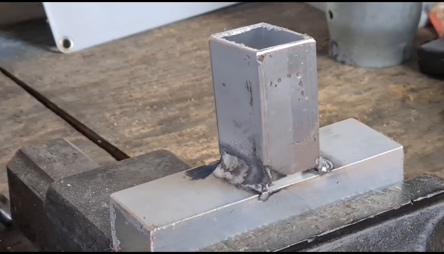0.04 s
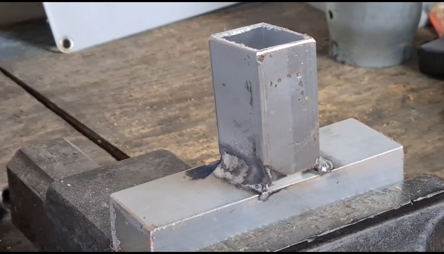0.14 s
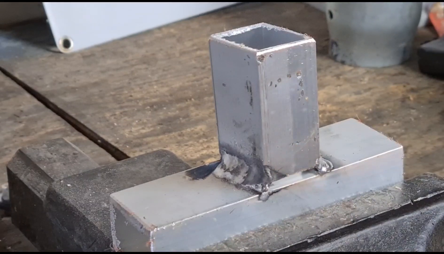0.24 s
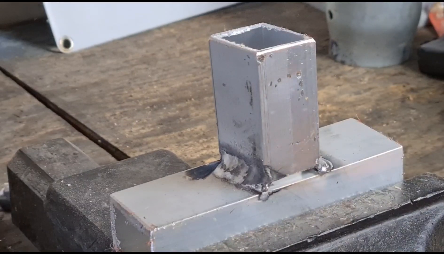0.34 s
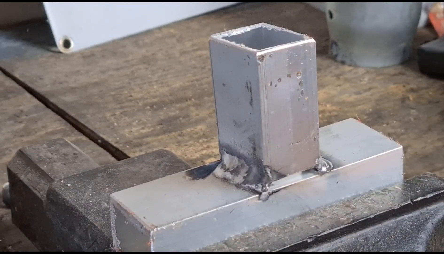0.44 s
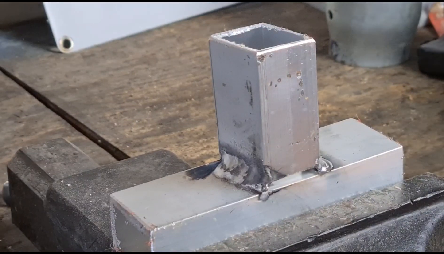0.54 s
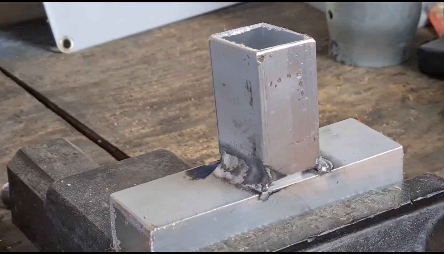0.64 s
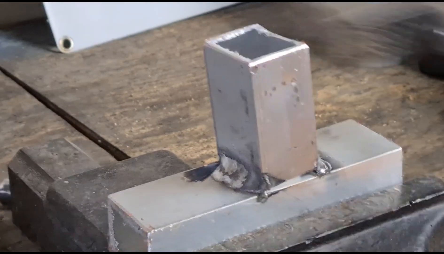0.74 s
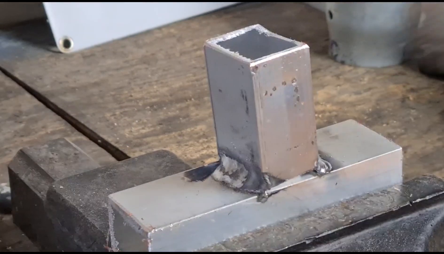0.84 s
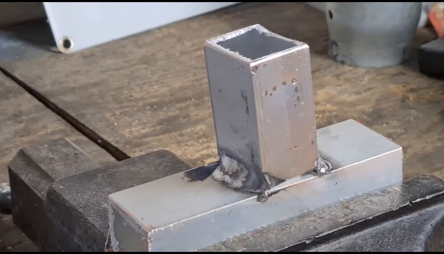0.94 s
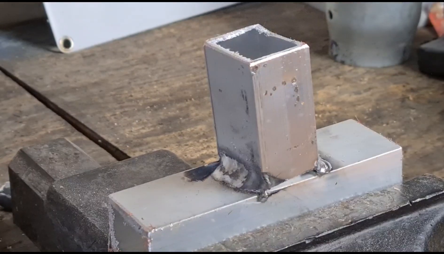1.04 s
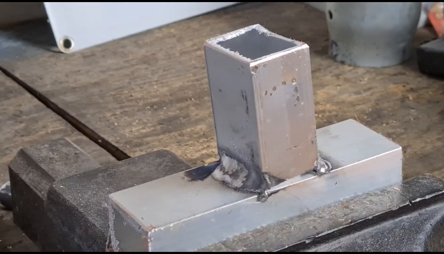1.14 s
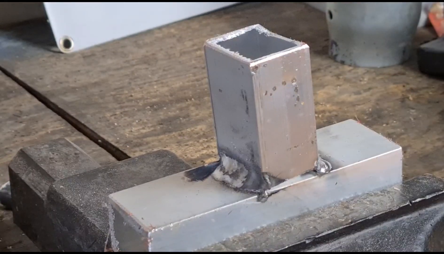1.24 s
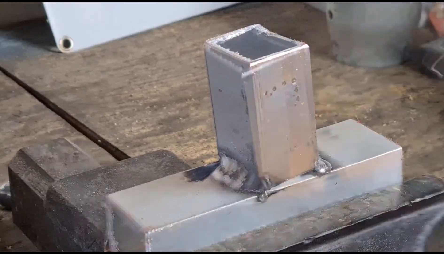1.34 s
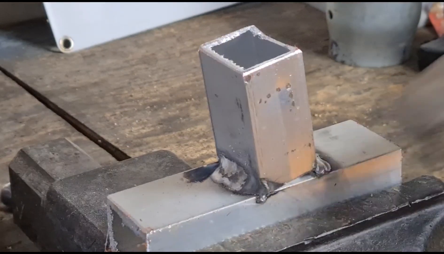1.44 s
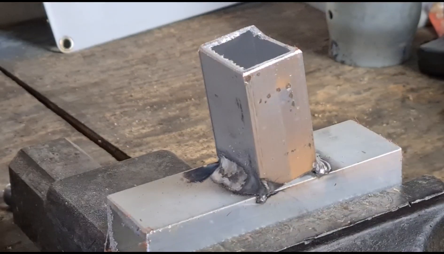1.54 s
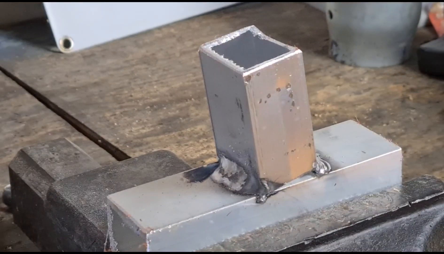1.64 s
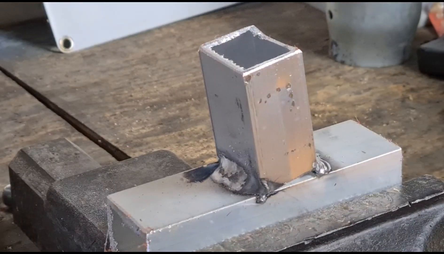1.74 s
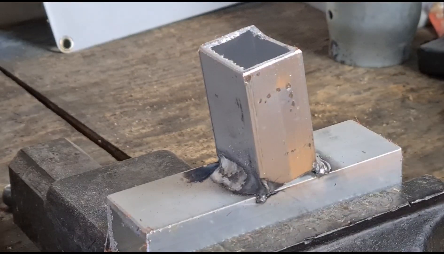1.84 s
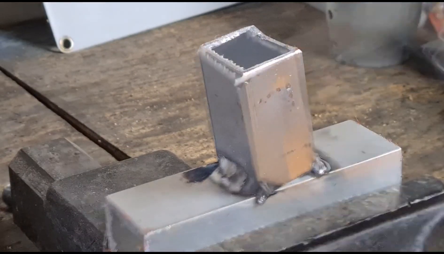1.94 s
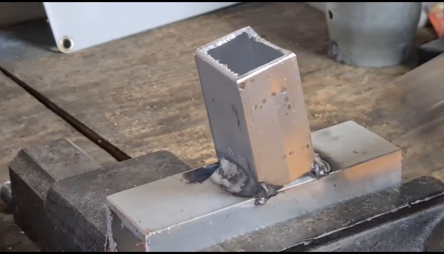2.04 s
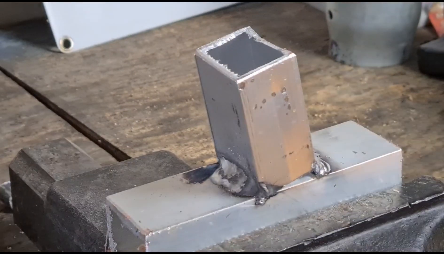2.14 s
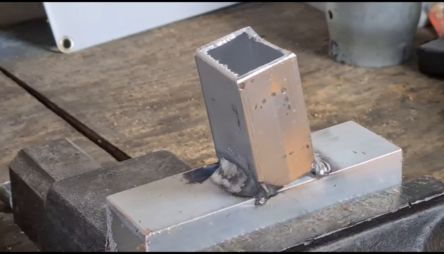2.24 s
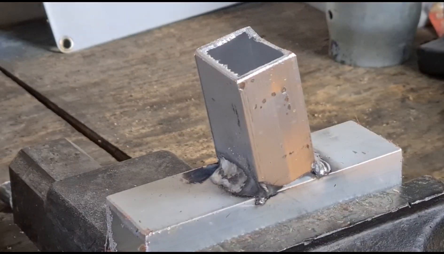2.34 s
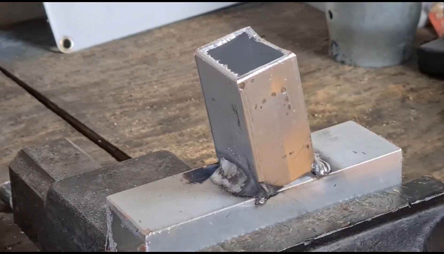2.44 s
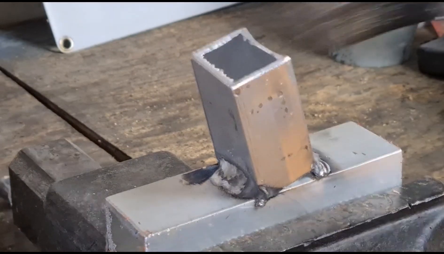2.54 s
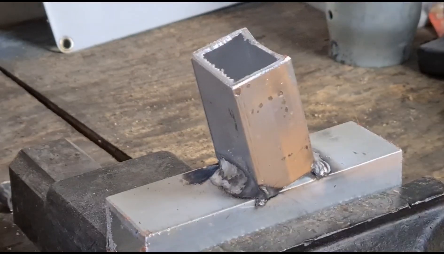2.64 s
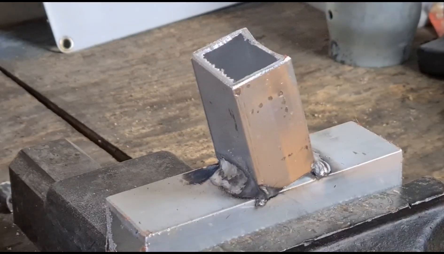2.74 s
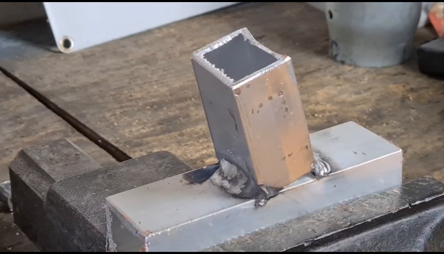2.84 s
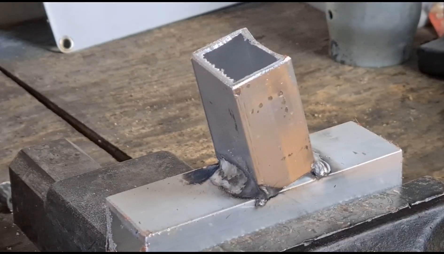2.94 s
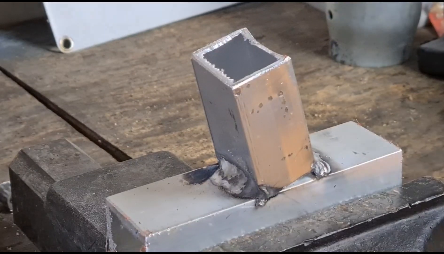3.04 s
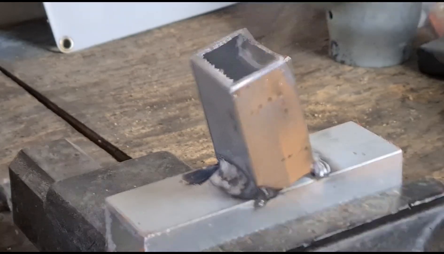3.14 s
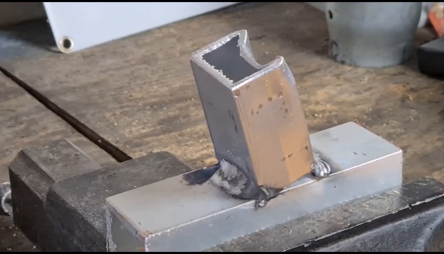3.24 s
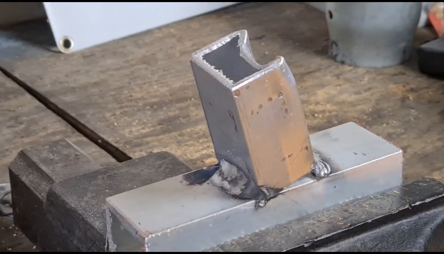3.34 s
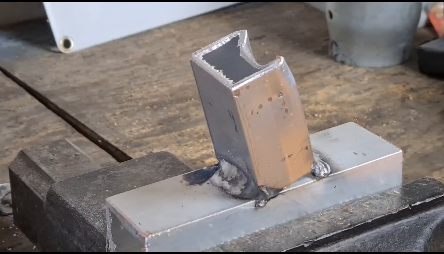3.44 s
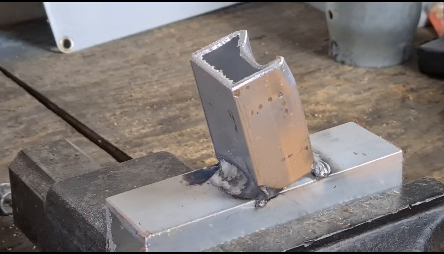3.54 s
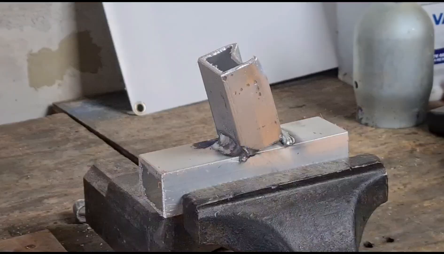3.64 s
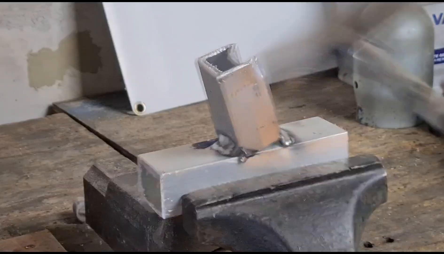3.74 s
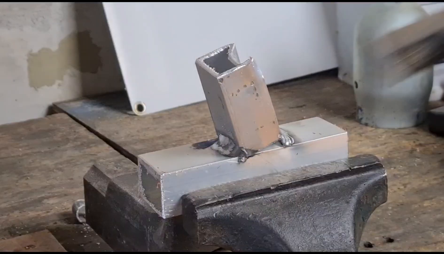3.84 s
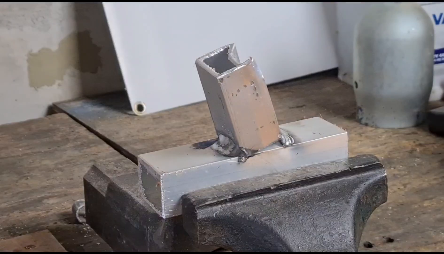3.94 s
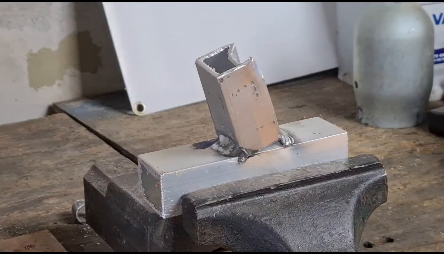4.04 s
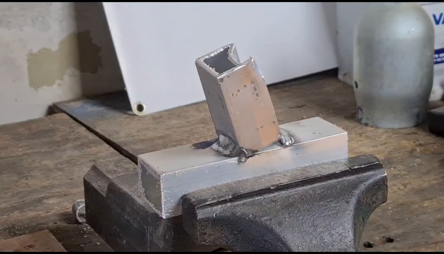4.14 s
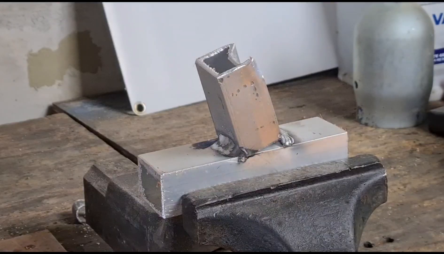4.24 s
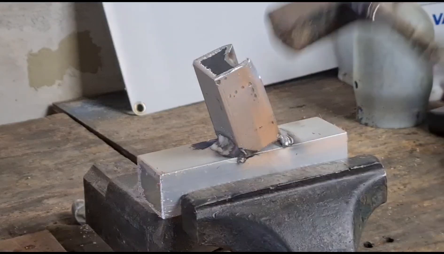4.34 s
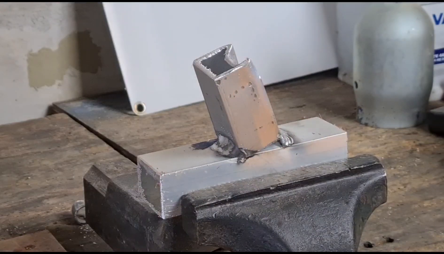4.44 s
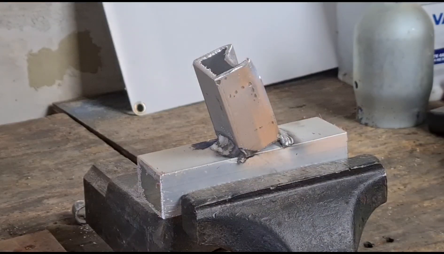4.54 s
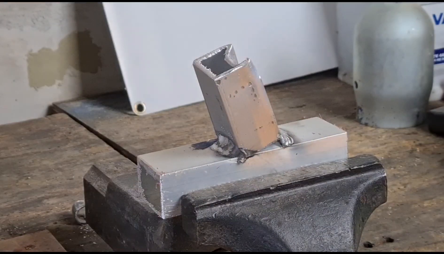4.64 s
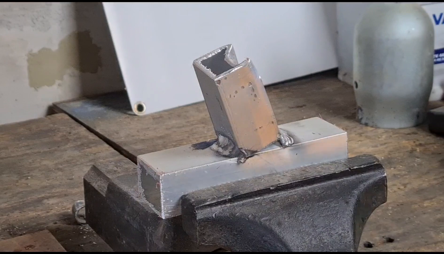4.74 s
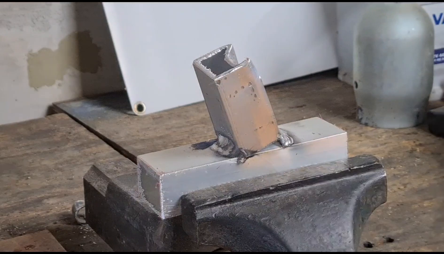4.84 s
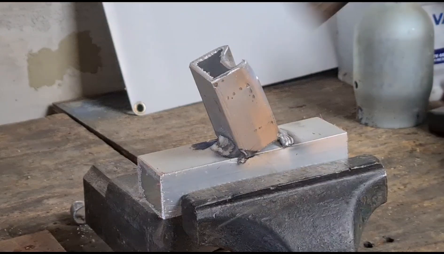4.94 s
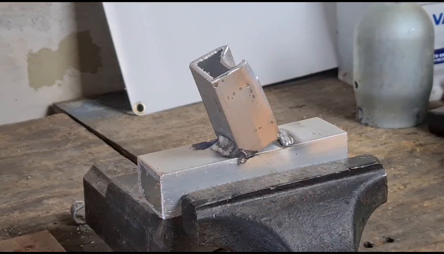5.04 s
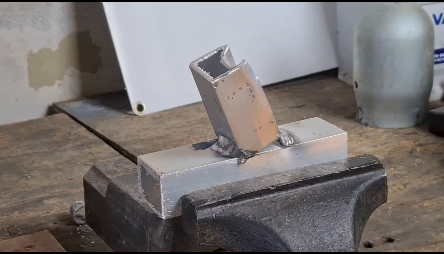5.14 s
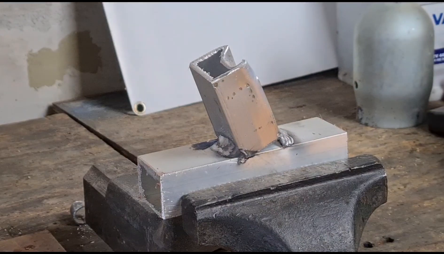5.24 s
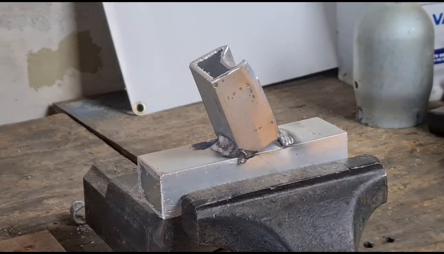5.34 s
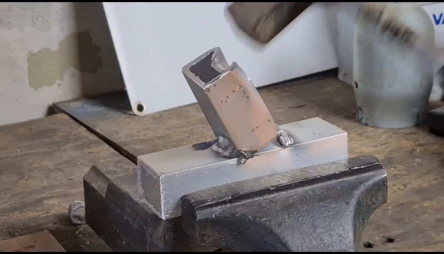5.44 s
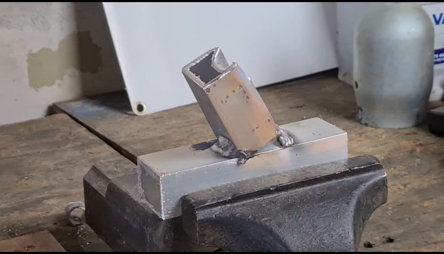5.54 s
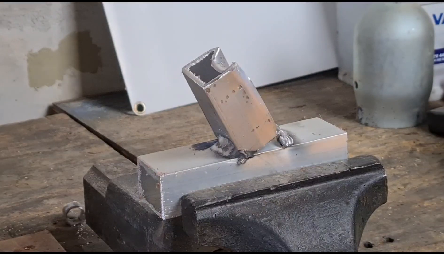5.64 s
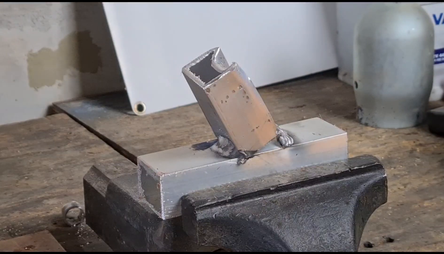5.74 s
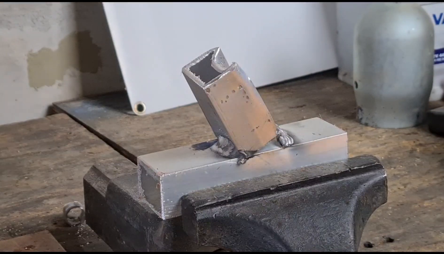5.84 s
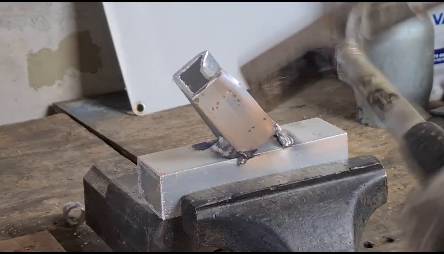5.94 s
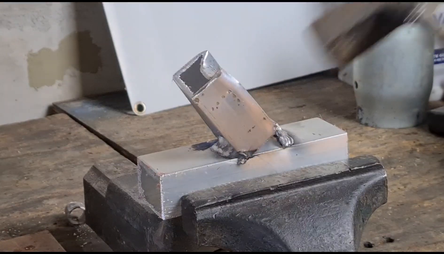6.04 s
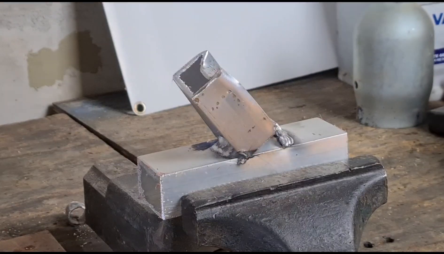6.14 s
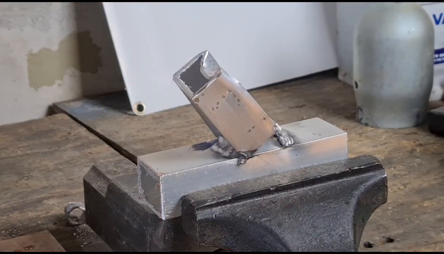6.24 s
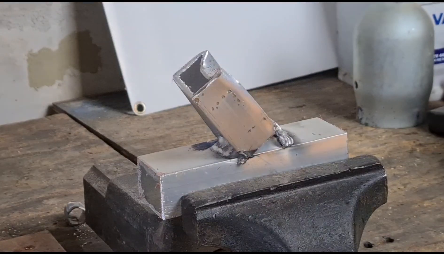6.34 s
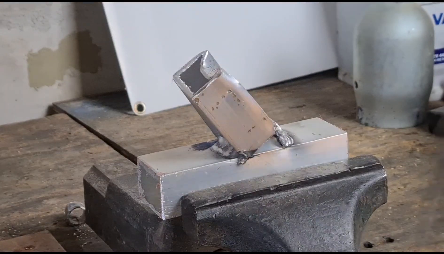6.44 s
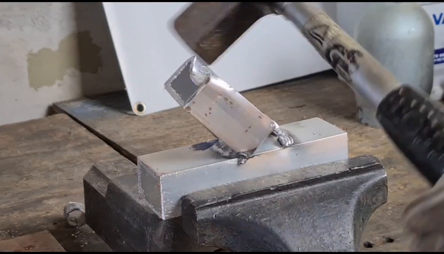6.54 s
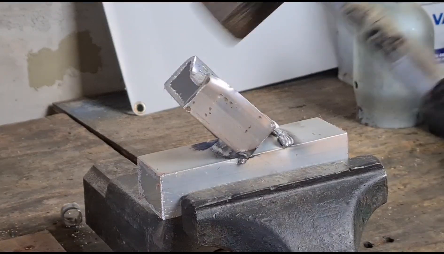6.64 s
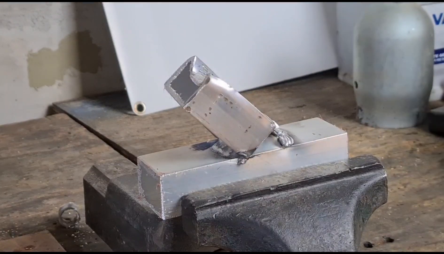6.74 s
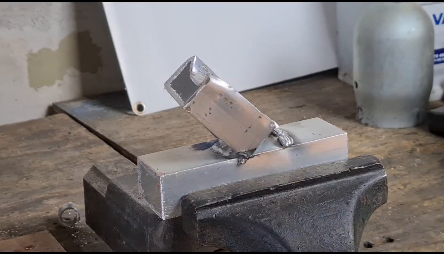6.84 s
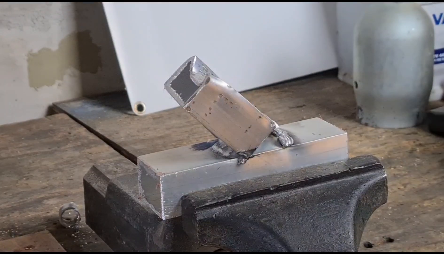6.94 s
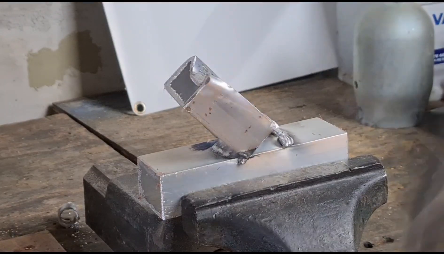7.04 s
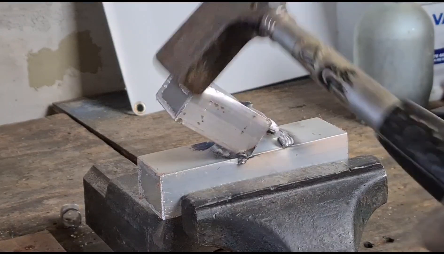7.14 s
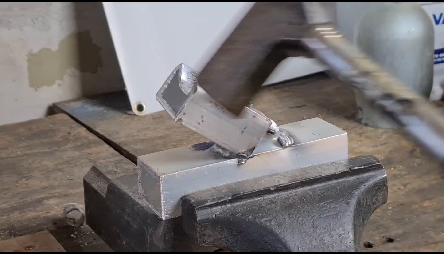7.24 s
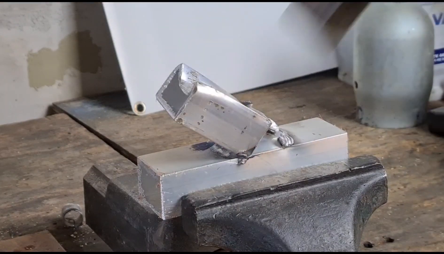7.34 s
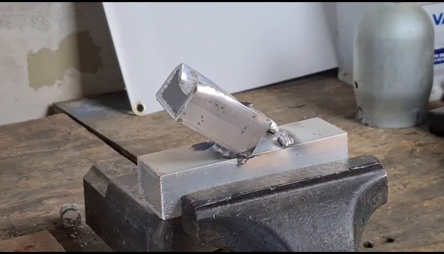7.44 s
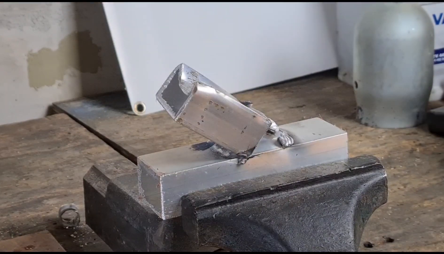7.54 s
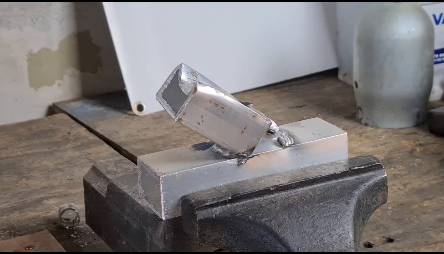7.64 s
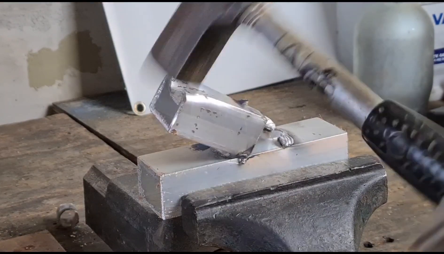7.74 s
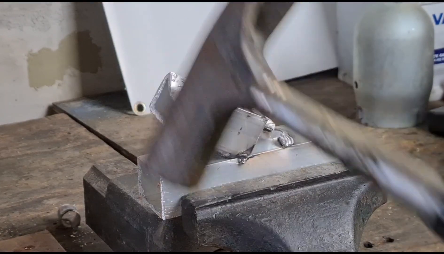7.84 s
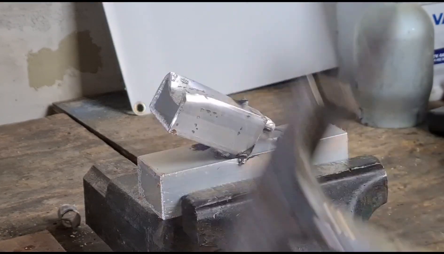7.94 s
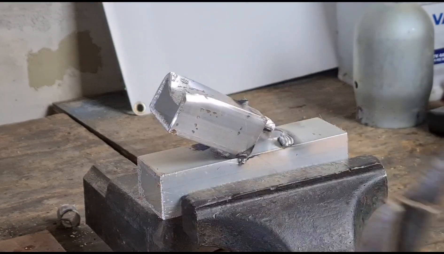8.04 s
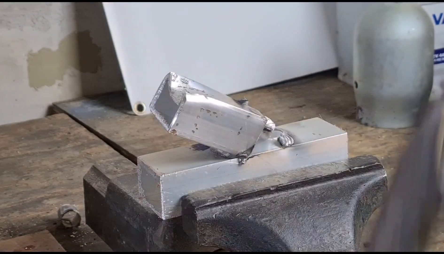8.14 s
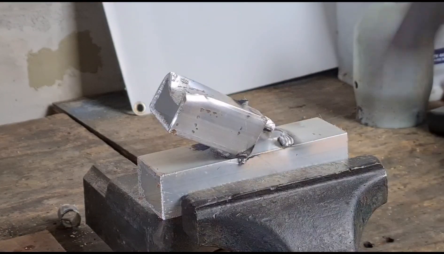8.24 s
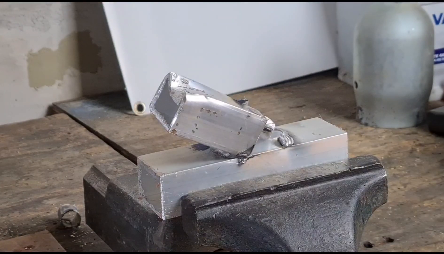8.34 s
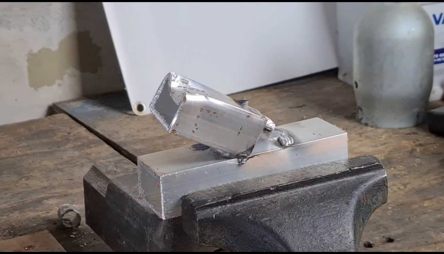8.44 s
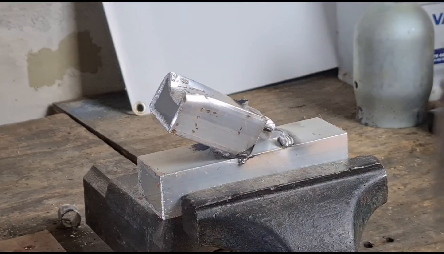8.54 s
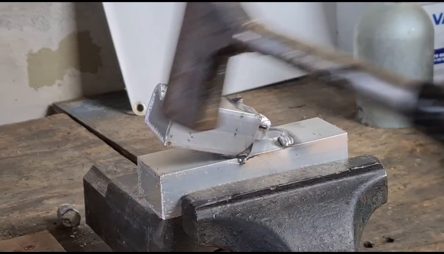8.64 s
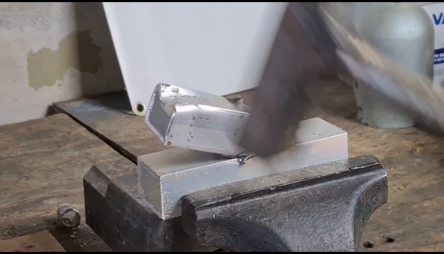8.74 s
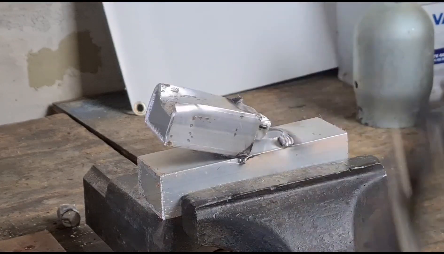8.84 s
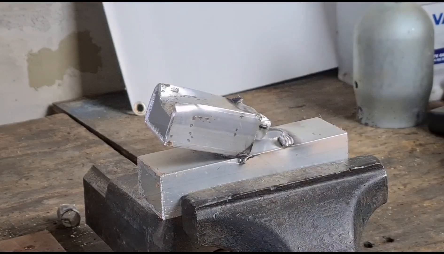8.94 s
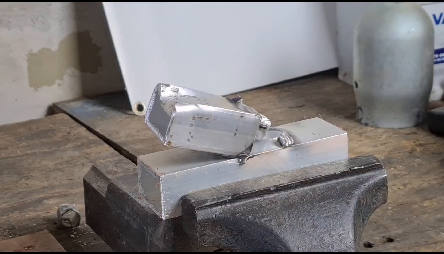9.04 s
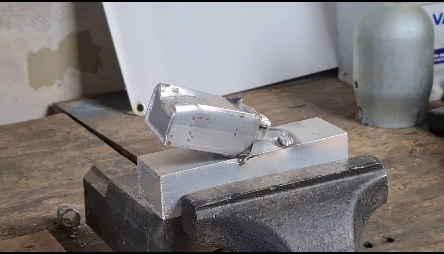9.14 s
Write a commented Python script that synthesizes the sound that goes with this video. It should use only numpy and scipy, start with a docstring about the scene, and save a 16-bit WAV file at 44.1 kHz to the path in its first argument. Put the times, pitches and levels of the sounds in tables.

```python
"""A heavy hammer beats down a square aluminium tube welded to a bar held in a bench vise.
Each impact cracks the yielding metal, excites the modes of tube and wooden bench, and reverberates
in a hard-walled workshop. As the weld gives way the tube folds ever faster: its ring shortens, the
blows thump deeper and end in a hard clank. A sleeve rustles and one swing whistles over a low rumble.
The blows are so loud that a limiter holds them flat for a moment before their tails can fall."""
import sys
import numpy as np
from scipy import signal
from scipy.io import wavfile
from scipy.ndimage import uniform_filter1d, minimum_filter1d

SR = 44100
rng = np.random.default_rng(int(sys.argv[2]) if len(sys.argv) > 2 else 0)


def dump(signal):
    """Clip the signal to [-1, 1] and save it as 16-bit WAV at the path in sys.argv[1]."""
    limited = np.clip(np.atleast_2d(signal).T, -1, 1)
    pcm = np.round(limited * 32767).astype(np.int16)
    wavfile.write(sys.argv[1], SR, pcm)


N = 405719

# Hammer impacts. Each row: start in seconds, force in dB, crack gain in dB, treble tilt in dB per
# octave, frequency of the dented wall in Hz, gain of that wall's ring in dB.
BLOWS = [(-.04, 0.5, -11, -2.5, 5000, -7.5), (0.882, -1, -8, -4, 4610, -0.5),
         (1.4699, 1, -8.5, -2, 5370, 1), (2.0675, 1, -8, -1, 5690, 2), (2.677, 1, -3.5, -0.6, 4650, 1),
         (3.293, .5, 3, -1.5, 5660, -4.5), (3.916, -0.5, -8.5, -3, 4960, 2), (4.447, .5, -13, -2, 5980, -1),
         (4.993, 1, -2.5, -0.9, 5350, -0.5), (5.5442, 0, -7.5, -1.2, 5240, -6),
         (6.0733, -3.5, 1, -1.9, 5000, 4.5), (6.6386, -2, 3.5, -2.8, 5500, -3.5),
         (7.2254, -2.5, 3.5, -0.6, 5580, -3.5), (7.8561, -4, -0.5, -4.5, 5570, -8),
         (8.7052, -5, -5, -0.5, 4780, 5.5)]
# Modes of the tube. Each row: nominal frequency in Hz, relative level in dB, decay time (t60) in
# seconds before the fold shortens it.
TUBE_MODES = [(1029, -20.5, 0.53), (1135, -24.5, .45), (1780, -24, 0.47), (2080, -32, .35),
              (3145, -30.5, 0.34), (3900, -24, 0.22), (4700, -25, 0.38), (5010, -22.5, .28),
              (5390, -22.5, .28), (5620, -24, .25), (6740, -26.5, 0.25), (6840, -27, .35),
              (7380, -23, 0.41), (9400, -26, 0.2)]
# Modes of bench and vise. Each row: frequency in Hz, relative level in dB, t60 in seconds.
BENCH_MODES = [(55.95, -28.5, 2), (100.8, -17.5, 1.54), (163.5, -8, 0.87), (258.6, -13.5, 0.38),
               (322.5, -13.5, 0.91), (360, -24.5, 0.91), (468, -20.5, 0.63), (537, -12.5, 0.3)]
# The blow as the room returns it. Each row: frequency in Hz, relative third-octave level in dB.
BOOM_SPECTRUM = [(35, -38), (70, -31), (125, -20.5), (200, -13.5), (320, -13), (700, -12), (1300, -15.5),
                 (2500, -15.5), (3800, -15), (5200, -10.5), (7500, -13.5), (11000, -16), (15000, -29)]
# Reverberation. Each row: frequency in Hz, t60 in seconds before the fold shortens it.
ROOM_T60 = [(60, 1.1), (150, 1.34), (320, 1.106), (800, 0.83), (2000, 0.79), (5000, 0.55), (10000, .47),
            (15000, 0.7)]
# The crack of yielding metal. Each row: frequency in Hz, relative third-octave level in dB.
CRACK_SPECTRUM = [(100, -38), (350, -11.5), (900, -18), (2500, -14.5), (3700, -7.5), (5200, -5), (7500, -8),
                  (15000, -16.5)]
# Arm swings. Each row: time of peak in seconds, Gaussian half width in seconds, rustle level in dB.
RUSTLES = [(.49, 0.054, -47), (0.686, 0.047, -51.5), (.818, 0.016, -47), (3.772, 0.029, -43),
           (3.864, 0.029, -33), (7.138, 0.024, -57), (8.286, 0.075, -52.5), (8.654, .03, -53.5)]
# Sleeve noise. Each row: frequency in Hz, relative third-octave level in dB.
SLEEVE_SPECTRUM = [(100, -43), (500, 1), (1200, 5.5), (2100, 0), (3200, 7), (5000, -3), (7200, 0),
                   (11000, -12), (15000, -13)]
# Workshop background. Each row: frequency in Hz, third-octave level in dB.
RUMBLE_SPECTRUM = [(30, -74.5), (55, -55), (100, -45), (170, -41.5), (300, -55), (600, -59), (1000, -56),
                   (1600, -60.5), (3200, -64), (5000, -71), (7800, -69), (10000, -74), (15000, -95)]

BAND_HZ = 31.25 * 2 ** (np.arange(28) / 3)   # third-octave centres
TIME = np.arange(N) / SR
AGE = np.arange(SR) / SR   # seconds since a blow
HUSH_S = 3.731   # here the ringing stops dead and the background dips


def from_db(db):
    """Amplitude grows tenfold for every 20 dB."""
    return 10 ** (np.asarray(db) / 20)


def at_hz(table, hz):
    """Interpolation on a log-frequency axis."""
    table_hz, value = np.transpose(table)
    return np.interp(np.log(hz), np.log(table_hz), value)


def bell(x, centre, half_width):
    """A Gaussian curve of height 1."""
    return np.exp(-.5 * ((x - centre) / half_width) ** 2)


def hump(x, centre, octaves):
    """A Gaussian curve on a logarithmic axis."""
    return bell(np.log2(x / centre), 0, octaves)


def decay(t60):
    """Free decay: a damped vibration loses 60 dB in t60 seconds."""
    return from_db(-60 * AGE / t60)


def build_up(rise_s):
    """Exponential approach to full amplitude after a blow."""
    return 1 - np.exp(-AGE / rise_s)


def band_noise(hz, shape, octaves=1 / 3):
    """Band-limited noise of rms 1, taken once the filter has run in."""
    edges = hz * 2 ** (np.array([-.5, .5]) * octaves)
    white = rng.standard_normal(shape[:-1] + (shape[-1] + SR // 10,))
    band_pass = signal.butter(2, edges, "band", fs=SR, output="sos")
    band = signal.sosfilt(band_pass, white)[..., -shape[-1]:]
    return band / band.std()


def steady_noise(spectrum):
    """Independent bands add in power to form a stationary noise."""
    return sum(from_db(at_hz(spectrum, hz)) * band_noise(hz, (N,)) for hz in BAND_HZ)


def workshop_rumble(lull_db=-13):
    """Ambient noise, strongest in the bass; its level dips from the hush to the next blow."""
    next_blow_s = min(row[0] for row in BLOWS if row[0] > HUSH_S)
    lull = (TIME > HUSH_S) & (TIME < next_blow_s)
    return steady_noise(RUMBLE_SPECTRUM) * from_db(lull_db * lull)


def sleeve_rustle():
    """Friction noise of cloth swells and fades with the swings of the arm."""
    cloth = steady_noise(SLEEVE_SPECTRUM)
    motion = sum(from_db(db) * bell(TIME, peak_s, half_s) for peak_s, half_s, db in RUSTLES)
    return motion * cloth / cloth.std()


def hammer_whistle(peak_s=3.866, half_s=.02, level_db=-31.5, slow_hz=494, fast_hz=660, width_hz=45):
    """Vortex shedding: on the fastest swing, eddies whistle higher and louder as speed rises."""
    speed = bell(TIME, peak_s, half_s)
    hz = slow_hz + (fast_hz - slow_hz) * speed
    eddies = signal.sosfilt(signal.butter(2, width_hz, fs=SR, output="sos"), rng.standard_normal(N))
    whistle = (1 + eddies / eddies.std()) * np.sin(2 * np.pi * np.cumsum(hz) / SR)
    return from_db(level_db) * speed * whistle


def register_levels(fold, ring_db):
    """The tube's angle sets the excitation of four registers, in dB for each blow."""
    yielding = hump(fold + 1e-9, centre=.11, octaves=2.1)   # the yielding weld turns thump into knock
    thump_db = 1.5 + 5 * fold - 3.5 * yielding   # downward blows thump again
    knock_db = -.75 + 3.5 * yielding
    clank_db = -.5 + 9 * fold ** 3.5   # clank and clang grow as the tube meets the bar
    clang_db = -2.5 + 7 * fold ** 1.2 + .3 * ring_db
    return thump_db, knock_db, clank_db, clang_db


def excitation(hz, landing, treble_hz=4000):
    """Where and how the hammer lands determines how strongly each frequency is driven."""
    thump_db, knock_db, clank_db, clang_db, tilt_db = landing
    low_db = thump_db * hump(hz, 91.5, octaves=.66) + knock_db * hump(hz, 292, octaves=.3)
    metal_db = clank_db * hump(hz, 1350, octaves=.53) + clang_db * hump(hz, 5260, octaves=.58)
    treble_db = tilt_db * np.log2(np.hypot(1, hz / treble_hz))
    return from_db(low_db + metal_db + treble_db)


def mode(hz, t60, scatter, mixing_s=.015, wander_s=.016):
    """One damped sinusoid per blow; interference with reflections makes amplitude and phase wander."""
    knots = np.arange(0, AGE[-1] + .1, wander_s)
    draws = rng.standard_normal((len(BLOWS), 2, len(knots)))
    reflections = np.array([np.interp(AGE, knots, real + 1j * imag) for real, imag in draws])
    wander = scatter * build_up(mixing_s) * reflections
    phase = 2 * np.pi * (hz * AGE + rng.random((len(BLOWS), 1)))
    return decay(t60) * ((1 + wander.real) * np.sin(phase) + wander.imag * np.cos(phase))


def bench_hum(landing, hum_rise_s=.0045, rocking_rise_s=.036, rocking_below_hz=120):
    """Resonance: the heavy vise sets the bench humming at once; its slow rocking builds up later."""
    hum = 0
    for hz, db, t60 in BENCH_MODES:
        onset = build_up(rocking_rise_s if hz < rocking_below_hz else hum_rise_s)
        hum += from_db(db) * excitation(hz, landing) * onset * mode(hz, t60, scatter=.47)
    return hum


def bench_heave(landing, gain_db=-19, hz=104, peak_s=.105, half_s=.033):
    """Inertia: the whole bench is slow to move, so its deep heave peaks well after the blow."""
    rumble = band_noise(hz, (len(BLOWS), len(AGE)), octaves=.5)
    return from_db(gain_db) * excitation(hz, landing) * bell(AGE, peak_s, half_s) * rumble


def bench_thud(landing, gain_db=-3, high_hz=470, low_hz=195, glide_s=.01984, peak_s=.026, half_s=.011):
    """Dispersion: higher bending waves cross the bench top faster, so the pitch falls."""
    hz = low_hz + (high_hz - low_hz) * np.exp(-AGE / glide_s)
    detuning = rng.uniform(.93, 1.07, (len(BLOWS), 1))
    chirp = np.sin(2 * np.pi * detuning * np.cumsum(hz) / SR)
    return from_db(gain_db) * excitation(hz.mean(), landing) * bell(AGE, peak_s, half_s) * chirp


def crack_and_boom(landing, crack_db, ring_scale, crack_t60=.2, contact_s=.015, contact_db=4,
                   room_rise_s=.0036, damped_above_hz=400):
    """Direct sound and reverberation: the wall cracks; bench and room answer, lows later and longer."""
    pressing = from_db(contact_db * np.exp(-(AGE / contact_s) ** 2))   # loudest under the hammer
    noise = 0
    for hz in BAND_HZ:
        period_s = 1 / hz
        damping = 1 / (1 + (damped_above_hz / hz) ** 2)   # the folded tube damps the upper ring
        boom_t60 = at_hz(ROOM_T60, hz) * ring_scale ** damping
        crack = from_db(crack_db + at_hz(CRACK_SPECTRUM, hz)) * pressing
        crack = crack * decay(crack_t60) * build_up(period_s)
        boom = from_db(at_hz(BOOM_SPECTRUM, hz)) * decay(boom_t60) * build_up(room_rise_s + period_s)
        envelope = excitation(hz, landing) * np.hypot(crack, boom)
        noise += envelope * band_noise(hz, (len(BLOWS), len(AGE)))
    return noise


def crumple(sounds, slip_energy=.13, slip_t60=.05, size=SR // 40, low_cut_hz=400):
    """Plastic deformation: metal yields in many small slips, giving each blow its own ragged spectrum."""
    slips = rng.standard_normal((len(BLOWS), size)) * decay(slip_t60)[:size]
    slips *= np.sqrt(slip_energy) / np.linalg.norm(slips, axis=1, keepdims=True)
    slips = signal.sosfilt(signal.butter(2, low_cut_hz, "high", fs=SR, output="sos"), slips)
    return sounds + signal.fftconvolve(sounds, slips, axes=1)[:, :len(AGE)]


def tube_ring(landing, wall_hz, ring_db, ring_scale, detune=.007, spread_db=2, wall_gain_db=-10.5):
    """Natural frequencies depend on shape: every dent shifts the modes, the struck wall's most of all."""
    body = 0
    for hz, db, t60 in TUBE_MODES:
        shift, strength = rng.standard_normal((2, len(BLOWS), 1))
        gain = from_db(db + spread_db * strength) * excitation(hz, landing)
        body += gain * mode(hz * (1 + detune * shift), t60 * ring_scale, scatter=1)
    wall = mode(wall_hz, t60=.32 * ring_scale, scatter=.6)
    return body + from_db(wall_gain_db + ring_db) * wall


def hammering(fold_power=3, upright_scale=.93, flat_scale=.64):
    """Impact excitation: each blow drives tube, bench and room; damping grows as the tube folds."""
    starts_s, force_db, crack_db, tilt_db, wall_hz, ring_db = np.transpose(BLOWS)[:, :, None]
    # 0 is upright, 1 flat on the bar: the weld resists at first, then tears faster and faster
    fold = np.linspace(0, 1, len(BLOWS))[:, None] ** fold_power
    landing = (*register_levels(fold, ring_db), tilt_db)
    ring_scale = upright_scale + (flat_scale - upright_scale) * fold   # multiplies decay times
    noise = crumple(crack_and_boom(landing, crack_db, ring_scale))
    tube = tube_ring(landing, wall_hz, ring_db, ring_scale)
    bench = bench_thud(landing) + bench_heave(landing) + bench_hum(landing)
    sounds = from_db(force_db) * (noise + tube + bench)
    track = np.zeros(N)
    for start_s, sound in zip(starts_s[:, 0], sounds):
        samples = round(start_s * SR) + np.arange(len(AGE))
        end = HUSH_S * SR if start_s < HUSH_S else N
        heard = (samples >= 0) & (samples < end)
        track[samples[heard]] += sound[heard]
    return track


def scene():
    """Superposition: the pressures of all sources add at one microphone close to the vise."""
    return (hammering() + sleeve_rustle() + hammer_whistle() + workshop_rumble())[None]


def limiter(x, ceiling_db=1, release_db_per_s=170, size=64):
    """Peak limiting: gain drops just ahead of each peak and climbs back at a steady rate."""
    excess_db = np.maximum(20 * np.log10(np.abs(x) + 1e-9) - ceiling_db, 0)
    release_db = release_db_per_s * TIME
    held_db = np.maximum.accumulate(excess_db + release_db, axis=-1) - release_db
    gain_db = uniform_filter1d(minimum_filter1d(-held_db, size), size)   # look ahead, then smooth
    return x * from_db(gain_db)


def record(dry, low_cut_hz=42, top_cut_hz=15500):
    """Band limiting and saturation: a low cut, the limiter, rounded peaks and a steep top cut."""
    limited = limiter(signal.sosfilt(signal.butter(4, low_cut_hz, "high", fs=SR, output="sos"), dry))
    rounded = limited / (1 + limited ** 8) ** (1 / 8)
    return signal.sosfilt(signal.ellip(10, .2, 90, top_cut_hz, fs=SR, output="sos"), rounded)


dry = scene()
out = record(dry)
dump(out)
```